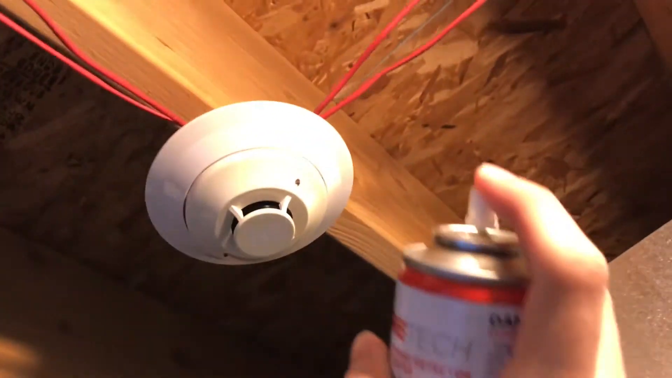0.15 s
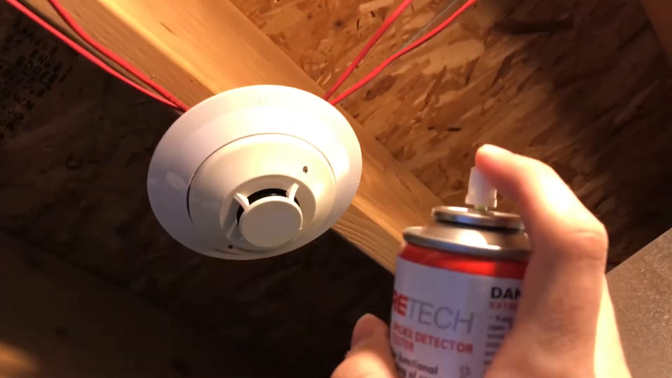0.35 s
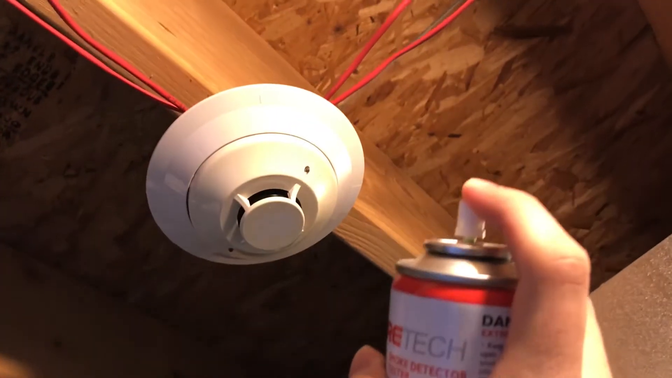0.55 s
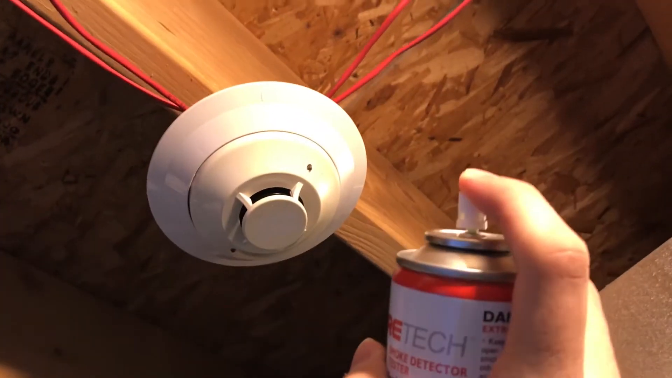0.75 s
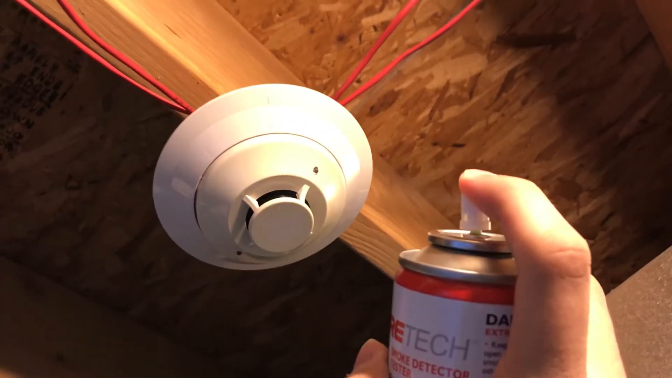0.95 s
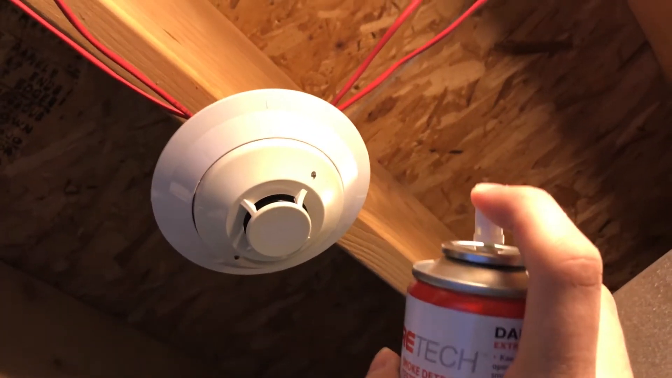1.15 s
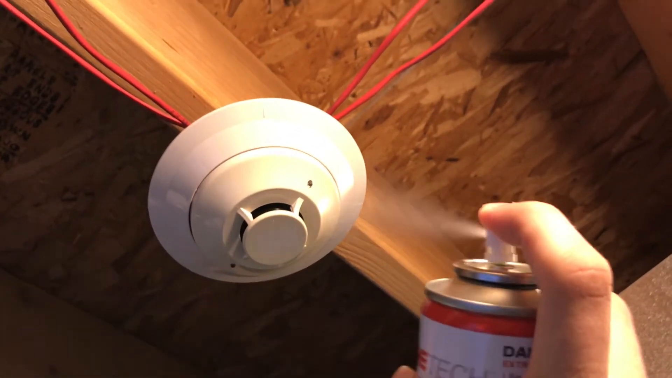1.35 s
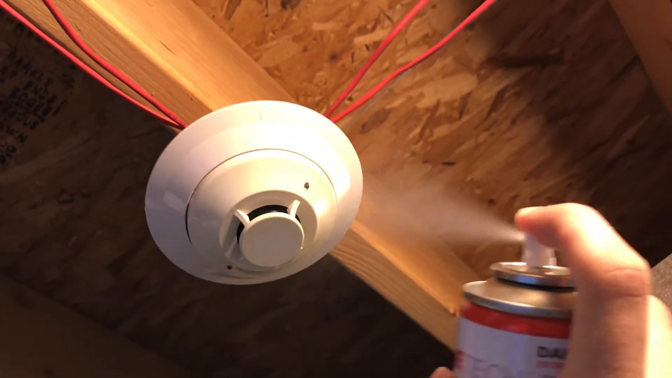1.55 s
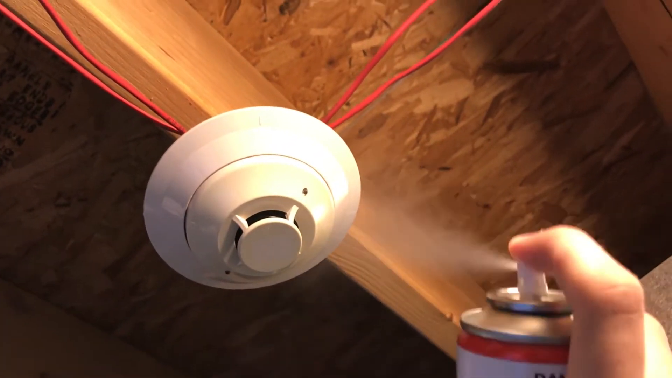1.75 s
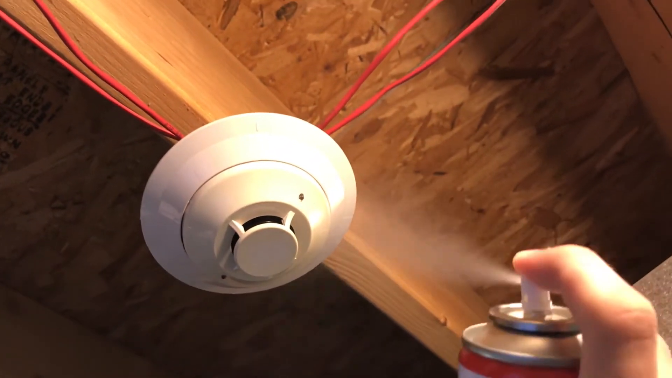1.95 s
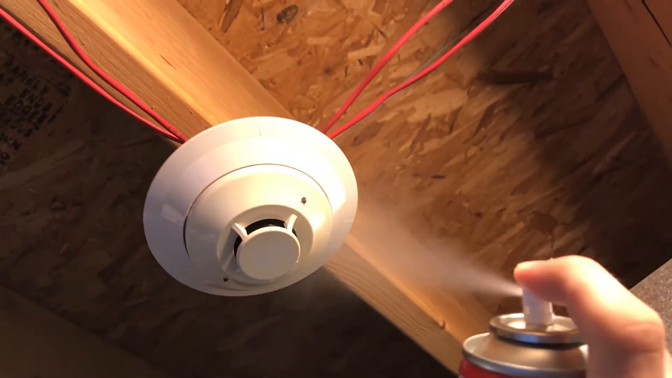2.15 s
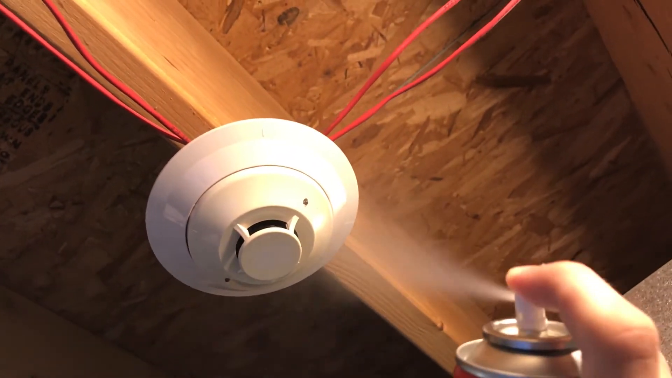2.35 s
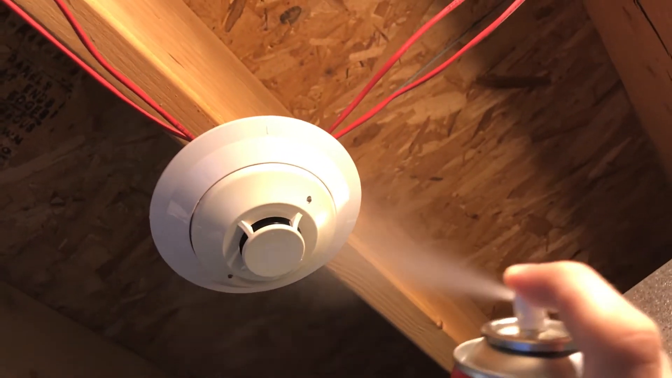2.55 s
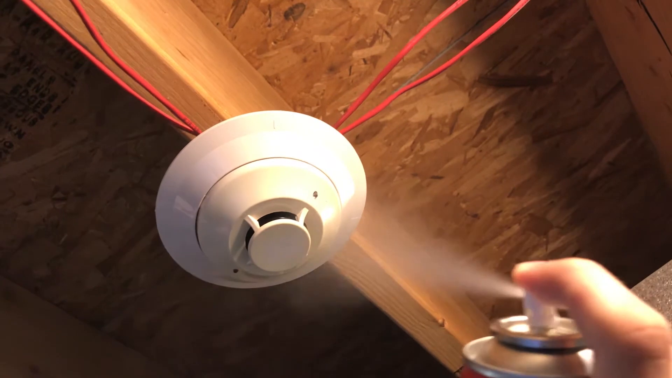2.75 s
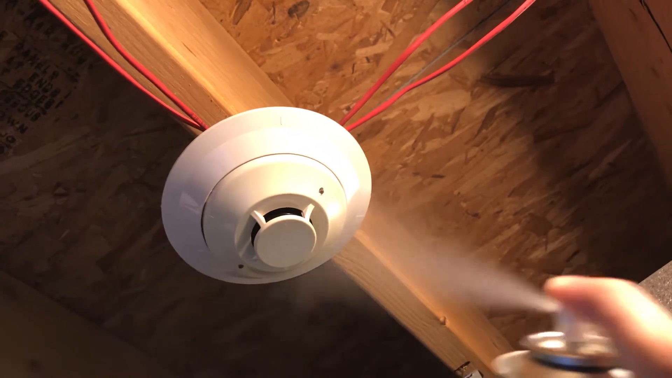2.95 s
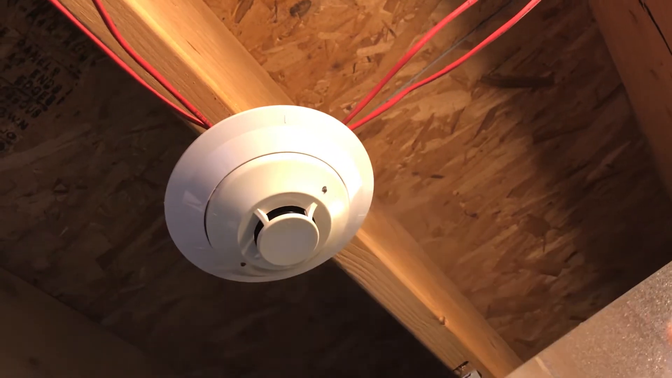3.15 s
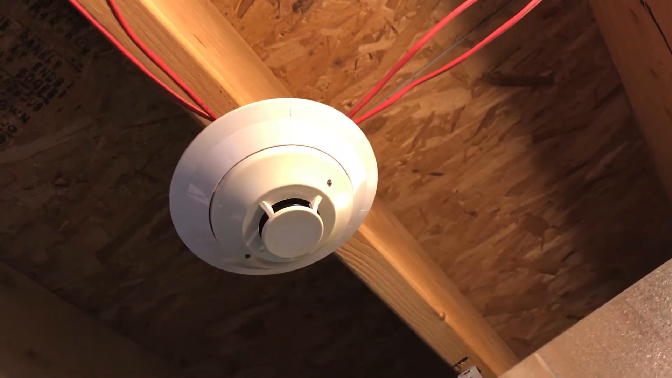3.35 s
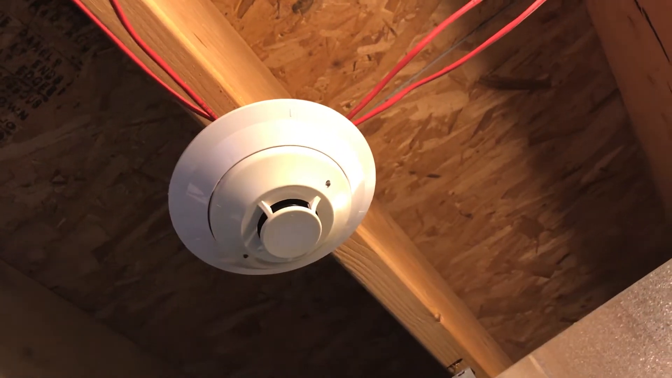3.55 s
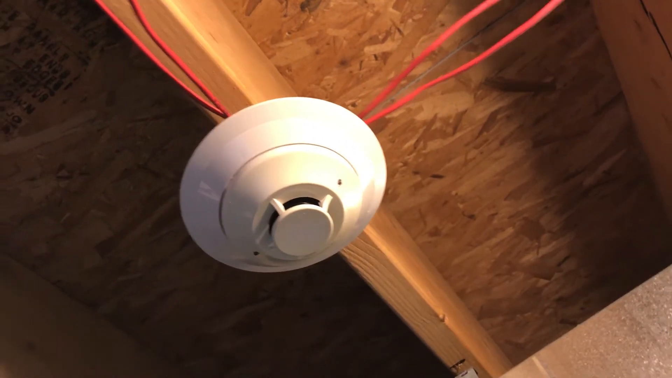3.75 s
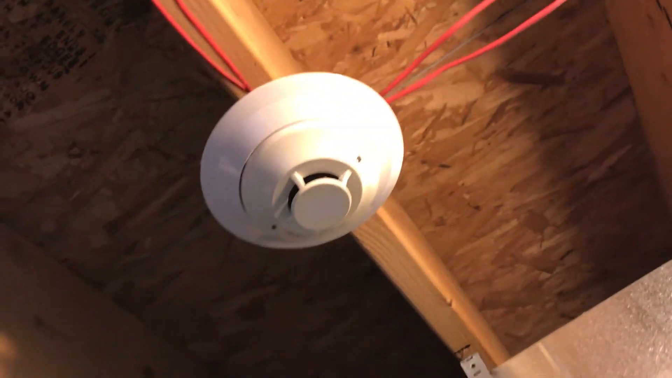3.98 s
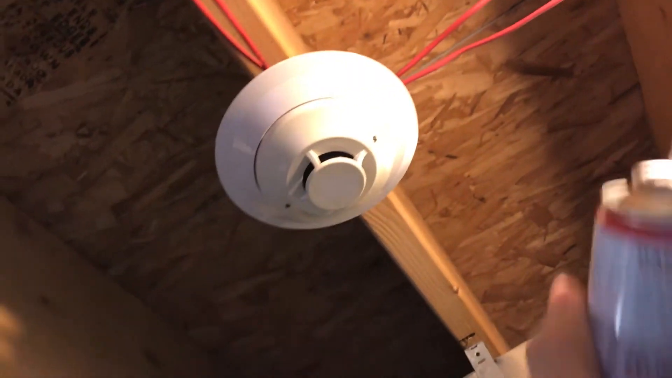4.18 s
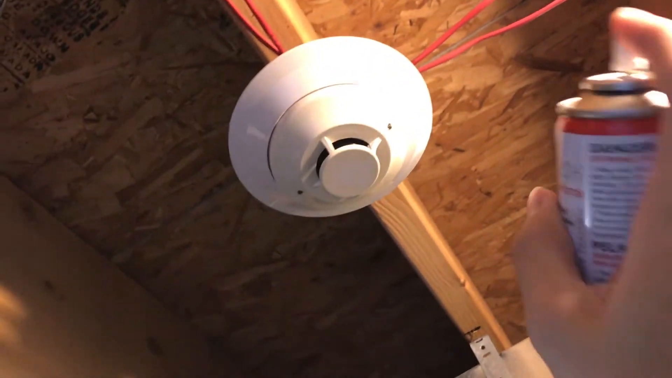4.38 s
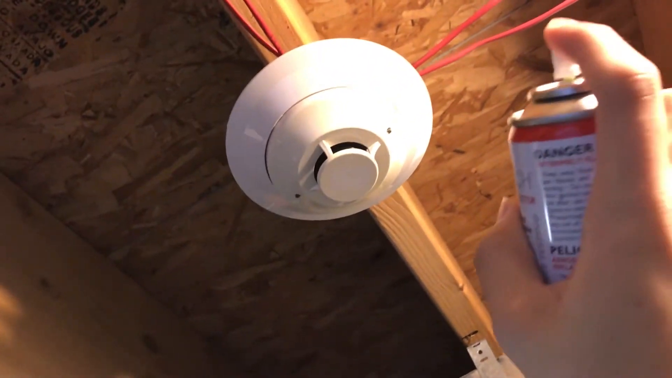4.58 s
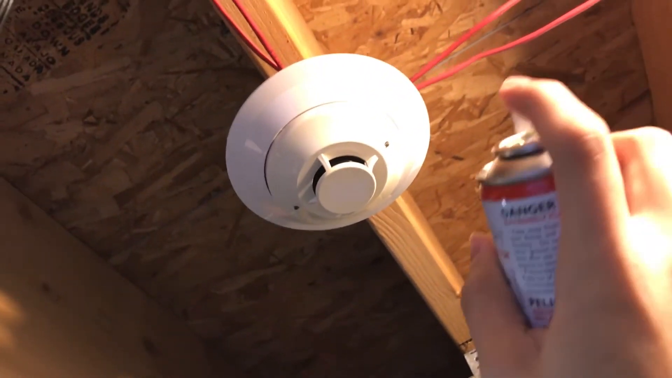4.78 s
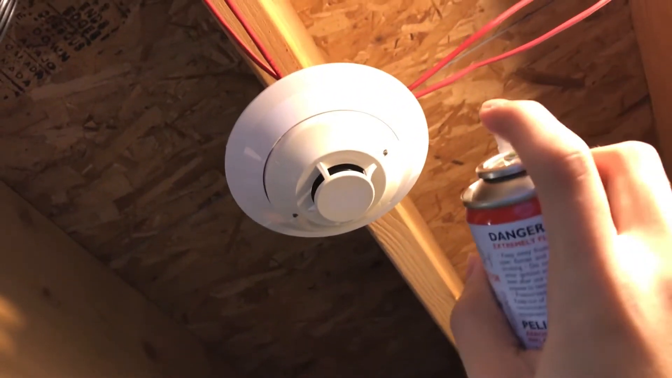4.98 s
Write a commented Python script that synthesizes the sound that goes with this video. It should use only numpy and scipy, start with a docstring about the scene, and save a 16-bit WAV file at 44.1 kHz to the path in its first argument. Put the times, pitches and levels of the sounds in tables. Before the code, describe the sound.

Close, mono-sounding capture under a wooden ceiling: low mains hum and quiet ventilation throughout. A spray can seeps faintly, opens into a weak, treble-heavy hiss, grows to one loud uneven burst, and is then pumped seven times with brief softer hiss between squirts. Afterwards only the hum remains, with a few light plastic ticks.

```python
"""Aerosol spray at a ceiling detector

An aerosol can is sprayed at a smoke detector on a wooden ceiling: jet noise, set by the valve's gas flow. The
valve seeps, hisses half open, gives one long burst, then is pumped in seven squeezes, with later seeps. Hum,
fan tones and standing waves (sines) and ventilation (shaped noise) fill the room; the hand makes faint ringing
ticks."""
import sys
import numpy as np
from scipy import signal
from scipy.fft import rfft, irfft
from scipy.io import wavfile
from scipy.ndimage import uniform_filter1d, map_coordinates

SR = 44100
rng = np.random.default_rng(int(sys.argv[2]) if len(sys.argv) > 2 else 0)


def transcribe(signal):
    """Save signal, clipped to [-1, 1], as a 16-bit WAV file at the path in sys.argv[1]."""
    frames = np.atleast_2d(signal).T
    limited = np.clip(frames, -1, 1)
    pcm = np.round(limited * 32767).astype(np.int16)
    wavfile.write(sys.argv[1], SR, pcm)


N = 221470
TIME = np.arange(N) / SR  # s
BINS = np.fft.rfftfreq(N, 1 / SR)  # Hz

# Steady tones: those of the fan and its motor, and at 490, 545, 607 and 1387 Hz the room's standing waves. Each
# row: frequency in Hz, level in dB rms.
STEADY_TONES = [(59.3, -57.5), (102.6, -45.5), (144, -51.5), (320.5, -58), (490, -64.5), (545, -62.5),
                (607, -65.5), (1387, -74), (1620, -68.5)]
# Treble of the ventilation. Each row: frequency in Hz, relative density in dB per Hz.
AIR_SPECTRUM = [(240, -39), (400, -2), (600, -3.5), (730, -5.5), (950, -5.5), (1500, -10), (2500, -15.5),
                (4000, -20.5), (6000, -25.5), (8000, -30.5), (12000, -32), (16000, -47)]
# Rumble of the ducts. Each row: frequency in Hz, relative density in dB per Hz.
RUMBLE_SPECTRUM = [(18, -44), (35, -16.5), (60, -11), (85, -3.5), (112, -5), (128, -2), (158, -1),
                   (188, -11), (205, -9.5), (255, -9), (285, -15), (325, -8), (400, -20), (520, -53.5)]
# Fizz of escaping gas, also the base colour of the ticks. Each row: frequency in Hz, relative dB per Hz.
SEEP_SPECTRUM = [(800, -18), (2500, 3), (6000, 1), (10400, 1.5), (12000, 2), (16000, -7)]
# Gas seeping from the almost shut valve. Each row: start in seconds, end in seconds, level in dB.
SEEP_EVENTS = [(.06, .23, -64.5), (0.32, .43, -58), (3.1, 3.455, -58), (3.63, 3.68, -65),
               (3.79, 3.92, -64.5)]
# Ticks of the finger on the cap and can. Each row: start in seconds, level in dB, ring in Hz.
TICK_EVENTS = [(3.436, -50, 5500), (3.642, -54, 13500), (3.803, -47, 8560), (3.937, -56, 11000),
               (4.477, -50, 2850)]
# The slow press to half open. Each row: time in seconds, flow as jet level in dB.
HALF_PRESS_FLOW = [(0.835, -65), (0.849, -49.5), (0.871, -43.5), (0.929, -40), (0.979, -33), (1.105, -39),
                   (1.265, -30), (1.35, -49)]
# The slow press to full flow. Each row: time in seconds, flow as jet level in dB.
FULL_PRESS_FLOW = [(1.35, -48.5), (1.424, -26.5), (1.456, -22), (1.536, -26), (1.672, -22), (1.734, -26.5),
                   (1.765, -40)]
# Quick squeezes, each to full flow. Each row: opening start in seconds, opening time in seconds,
# moment the finger eases in seconds, flow left until the next squeeze in dB.
SQUEEZES = [(1.769, 0.035, 1.9065, -43), (1.993, 0.02, 2.104, -29), (2.184, 0.011, 2.305, -32.5),
            (2.382, 0.012, 2.516, -37.5), (2.579, 0.012, 2.704, -34), (2.756, 0.0081, 2.885, -45),
            (2.938, 0.0085, 3.05, -69)]
# The jet with the valve wide open. Each row: frequency in Hz, relative density in dB per Hz.
OPEN_JET_SPECTRUM = [(150, -29), (450, -15), (800, -13), (1400, -6.5), (1800, -10), (3000, -4),
                     (4400, -8.5), (5800, -2.5), (7600, -7.5), (8500, -6), (9600, -7.5), (12400, -3.5),
                     (13500, -6), (16000, -4)]
# The thinner jet of a half-open valve. Each row: frequency in Hz, relative density in dB per Hz.
THIN_JET_SPECTRUM = [(300, -11), (1700, -14.5), (3100, -9), (4500, -9.5), (5800, -2.5), (7900, -6),
                     (9100, -7), (9650, -3.5), (11000, -2.5), (12900, -0.5), (13800, -9), (14500, -1.5),
                     (16000, 1.5)]
# Broad resonance of the nozzle's bore. One row: centre in Hz, width in Hz, gain in dB when wide open.
BORE_RESONANCE = (14700, 1650, 5.7)
# Faint whistles of the nozzle, heard from its side. Each row: centre in Hz, width in Hz,
# gain in dB when wide open and not yet turned.
NOZZLE_WHISTLES = [(8630, 170, 5.5), (12300, 140, 5.5)]
# Decay of the room. Each row: frequency in Hz, time to fall by 60 dB in seconds.
ROOM_DECAY = [(300, .35), (3000, .33), (8000, .3), (16000, .25)]
# Band swallowed by the microphone's port. One row: centre in Hz, half-width in Hz, gain in dB.
MICROPHONE_NOTCH = (10420, 350, -6.5)

HUM_HZ, HUM_DB = 120, -33  # dB rms
# the fan's whine swells as the microphone moves: start level and rise in dB, start and end in s
WHINE_HZ, WHINE_DB, WHINE_SWELL_DB, WHINE_SWELL_S = 846, -63.5, 5, (1.5, 3.8)
AIR_DB = -49
SEEP_EDGE_S = .03  # rise and fall time of a seep
SQUEEZE_DB = -22.5  # jet level with the cap pressed right down
CLOSING_S = .028  # the spring pushes the cap back in about this time
DIPS_PER_S, DIP_DB, DIP_S = 7.6, -1, 0.002  # mean rate, gain at full flow, time from centre to 1/e
EDGE_HZ = 15820  # upper band limit of the recorder


def amp(db):
    """Decibel law: a level in dB becomes an amplitude ratio."""
    return 10 ** (np.asarray(db) / 20)


def unit(x):
    """Normalisation of power: scales to rms 1."""
    return x / np.sqrt(np.mean(x ** 2) + 1e-20)


def read(points, hz):
    """Linear interpolation of a table on a log-frequency axis."""
    table_hz, value = np.transpose(points)
    return np.interp(np.log(hz + 1), np.log(table_hz + 1), value)


def noise(colour_db):
    """Spectral shaping: white noise weighted bin by bin, then brought to rms 1."""
    white = rng.standard_normal(N)
    return unit(irfft(rfft(white) * amp(colour_db), N))


def drift(rate_hz):
    """Low-pass random process of rms 1, falling off steeply above the rate."""
    return noise(-10 * np.log10(1 + (BINS / rate_hz) ** 6))


def held(start, end, rise, fall):
    """Gate envelope: a linear rise, a hold at 1 until the end, then half a bell curve down."""
    opening = np.clip((TIME - start) / rise, 0, 1)
    closing = np.exp(-(np.maximum(TIME - end, 0) / fall) ** 2)
    return opening * closing


def hum(hum_waver=0.12, fan_waver=0.38, fan_slip=0.45):
    """Superposed tones: a transformer note of nearly even level, and fan and room tones wavering in level and
    phase."""
    phase = 2 * np.pi * (HUM_HZ * TIME + rng.random())
    out = amp(HUM_DB) * (1 + hum_waver * drift(8.5)) * np.sin(phase)
    whine_db = WHINE_DB + WHINE_SWELL_DB * np.interp(TIME, WHINE_SWELL_S, [0, 1])
    for hz, db in STEADY_TONES + [(WHINE_HZ, whine_db)]:
        slip = fan_slip * np.sqrt(hz / HUM_HZ) * drift(1.3)  # radians
        phase = 2 * np.pi * (hz * TIME + rng.random()) + slip
        out += amp(db) * (1 + fan_waver * drift(4.7)) * np.sin(phase)
    return np.sqrt(2) * out  # a sine's peak is root two times its rms


def ventilation(rumble_db=-41, surge_db=1, ripple_db=1.):
    """Broadband flow noise: surging duct rumble, and moving air rippled by the room's standing waves."""
    ripple = uniform_filter1d(rng.standard_normal(len(BINS)), size=110)  # along frequency
    ripple = unit(uniform_filter1d(ripple, size=70))
    air = noise(read(AIR_SPECTRUM, BINS) + ripple_db * ripple)
    surge = amp(rumble_db + surge_db * drift(5.7))
    return surge * noise(read(RUMBLE_SPECTRUM, BINS)) + amp(AIR_DB) * air


def seep():
    """Leakage noise: gas through a nearly shut gap fizzes faintly before and after the squeezes."""
    leak = sum(amp(db) * held(start, end, SEEP_EDGE_S, SEEP_EDGE_S) for start, end, db in SEEP_EVENTS)
    return noise(read(SEEP_SPECTRUM, BINS)) * leak


def ticks(t60=.06, rise=.003, ring_width=.09, ring_db=9):
    """Damped resonance: short plastic ticks, each with one broad ring and little far above it."""
    out = np.zeros(N)
    for start, db, hz in TICK_EVENTS:
        age = np.maximum(TIME - start, 0)
        ring = ring_db / (1 + ((BINS / hz - 1) / ring_width) ** 2)
        treble_loss = 10 * np.log10(1 + (BINS / hz / 2) ** 4)
        colour_db = read(SEEP_SPECTRUM, BINS) + ring - treble_loss
        decay = amp(db - 60 * age / t60)
        out += noise(colour_db) * decay * np.minimum(age / rise, 1)
    return out


def valve():
    """Throttling: gas flow as a gain, two slow presses, then squeezes that snap open and ease nearly shut."""
    presses = np.concatenate([HALF_PRESS_FLOW, FULL_PRESS_FLOW])
    flow = amp(np.interp(TIME, *presses.T, left=-120, right=-120))
    until = [row[0] for row in SQUEEZES[1:]] + [SQUEEZES[-1][2]]
    for (opens, opening, eases, left_db), next_opens in zip(SQUEEZES, until):
        left = amp(left_db) * held(opens, next_opens, opening, CLOSING_S)
        pressed = (amp(SQUEEZE_DB) - amp(left_db)) * held(opens, eases, opening, CLOSING_S)
        flow = np.maximum(flow, left + pressed)
    return flow


def spits(flow):
    """Random arrivals: drops of liquid pass the nozzle and the level dips briefly, more at high flow; in dB."""
    drops = TIME[rng.random(N) < DIPS_PER_S / SR]
    dips = sum(np.exp(-((TIME - at) / DIP_S) ** 2) for at in drops)
    return DIP_DB * flow / flow.max() * dips


def jet(full_db=-23, half_open_db=-35.0, flutter_db=0.5, beam_db=3, level_db=0.0):
    """Turbulent mixing at the nozzle: a throttled jet loses its low hiss faster than its top."""
    flow = valve()
    hz, t, white = signal.stft(rng.standard_normal(N), SR, nperseg=512, noverlap=448)
    hz = hz[:, None]
    flow_db = 20 * np.log10(np.interp(t, TIME, flow))
    throttle = np.clip((full_db - flow_db) / (full_db - half_open_db), 0, 1)  # 0 open, 1 half open or less
    colour_db = (1 - throttle) * read(OPEN_JET_SPECTRUM, hz) + throttle * read(THIN_JET_SPECTRUM, hz)
    ring_hz, width_hz, ring_db = BORE_RESONANCE
    colour_db += ring_db * (1 - 0.37 * throttle) * np.exp(-(2 * (hz - ring_hz) / width_hz) ** 4)
    # as the hand turns the can, the beamed top of the hiss grows and the whistles fade
    turned = np.interp(t, [1.6, 2.5], [0, 1])
    colour_db += beam_db * (turned - .7) * np.interp(hz, [11000, 14500], [-.25, .55])
    whistles = sum(db / (1 + (2 * (hz - f) / width) ** 2) for f, width, db in NOZZLE_WHISTLES)
    colour_db += (1 - turned) * (1 + .5 * throttle) * whistles
    colour = amp(colour_db)
    # equal power in every frame, so that the flow alone sets the level
    colour /= np.sqrt(np.mean(colour ** 2 * (hz < EDGE_HZ), axis=0))
    hiss = signal.istft(white * colour, nperseg=512, noverlap=448)[1][:N]
    return hiss * flow * amp(level_db + spits(flow) + flutter_db * drift(130))


def near_echoes(x, share=0.065, sway=0.068, count=9):
    """Comb filtering: hand, detector and joist reflect the hiss; the comb wanders as the hand sways."""
    out = x.copy()
    for delay in np.geomspace(.0013, .0055, count):  # s
        path = delay * rng.uniform(.9, 1.1) * (1 + sway * drift(0.74))
        echo = map_coordinates(x, [(TIME - path) * SR], order=3)
        out += share * rng.choice([-1, 1]) * echo
    return out / np.sqrt(1 + count * share ** 2)


def room(x, wet_db=-12.0, build_up=0.0027):
    """Diffuse reverberation: a short tail from the timber, each band dying at its own speed."""
    hz, t, z = signal.stft(rng.standard_normal(SR // 2), SR, nperseg=256)
    decay = amp(-60 * t / read(ROOM_DECAY, hz)[:, None])
    tail = signal.istft(z * decay, SR, nperseg=256)[1]
    tail *= np.clip(np.arange(len(tail)) / SR / build_up, 0, 1) ** 2
    return x + amp(wet_db) * signal.fftconvolve(x, tail / np.linalg.norm(tail))[:N]


def scene():
    """Superposition: all sources add at one microphone, which feeds both channels alike."""
    near = near_echoes(jet()) + seep() + ticks()
    mono = room(near) + hum() + ventilation()
    return np.array([mono, mono])


def record(dry):
    """Linear filtering: the microphone's notch, then the recorder's band limit."""
    hz, width_hz, db = MICROPHONE_NOTCH
    ends = np.minimum(np.minimum(TIME, TIME[::-1]) / .003, 1)  # eased against clicks
    notch = amp(db / (1 + ((BINS - hz) / width_hz) ** 2))
    heard = irfft(rfft(dry * ends) * notch, N)
    band_limit = signal.firwin(1023, EDGE_HZ, window=("kaiser", 9), fs=SR)
    return signal.oaconvolve(heard, band_limit[None], "same")


dry = scene()
out = record(dry)
transcribe(out)
```